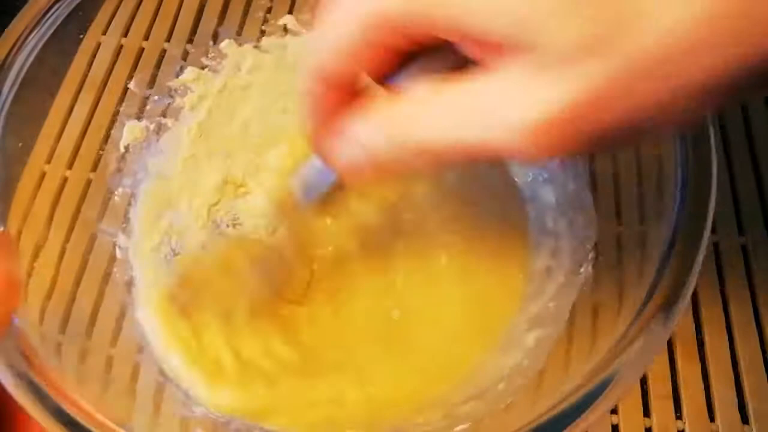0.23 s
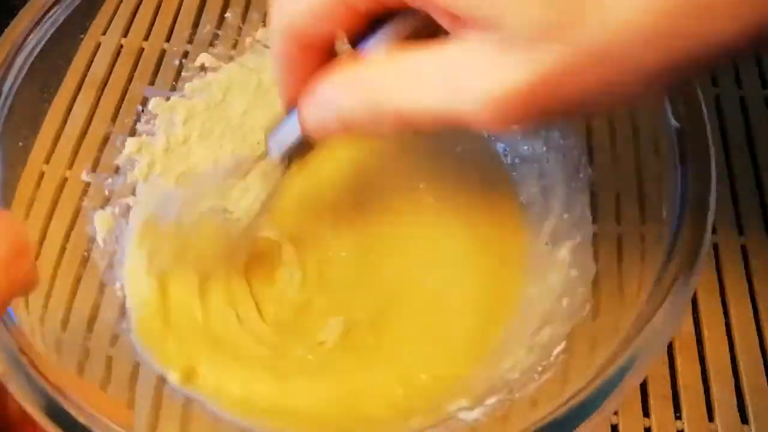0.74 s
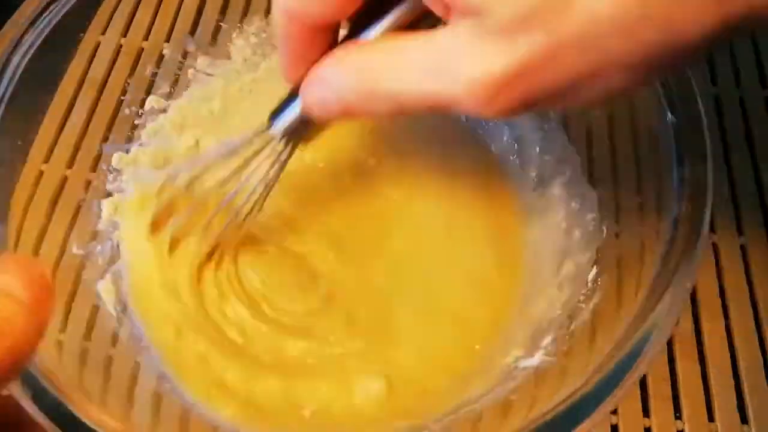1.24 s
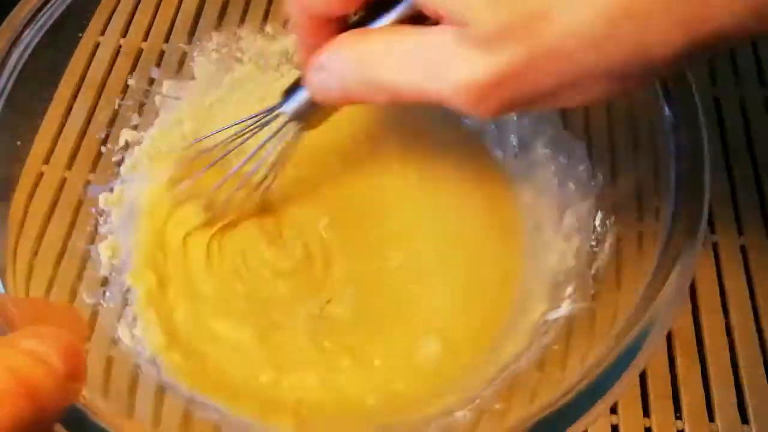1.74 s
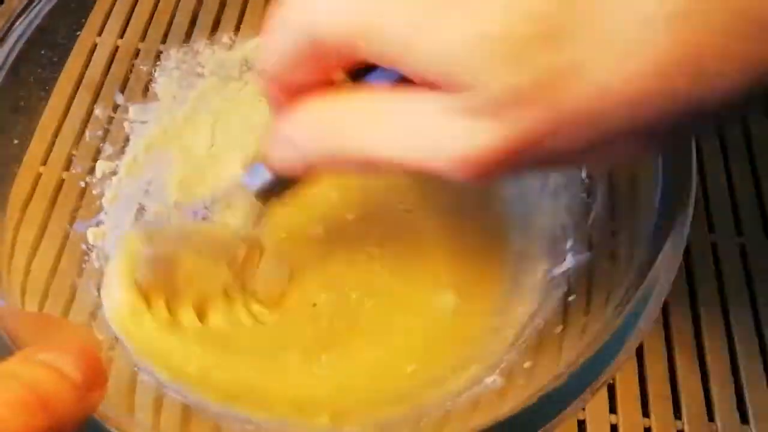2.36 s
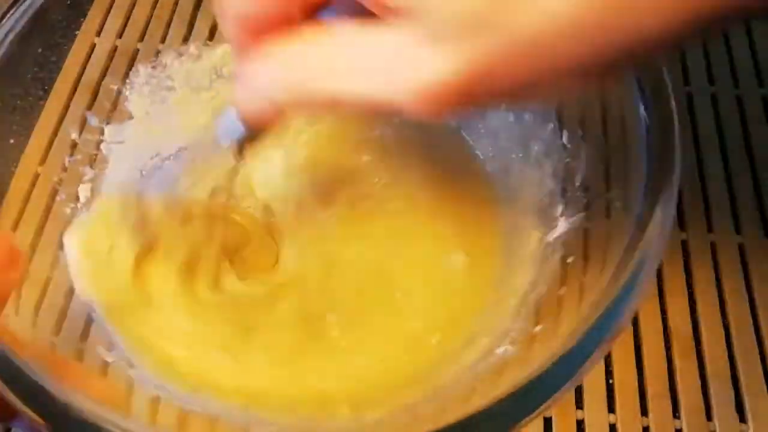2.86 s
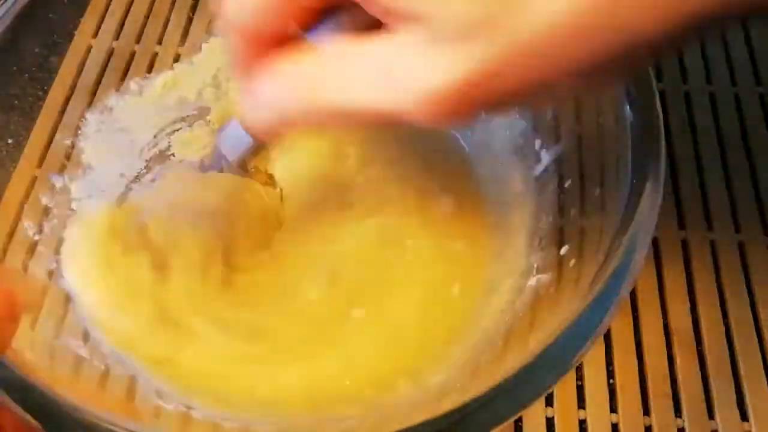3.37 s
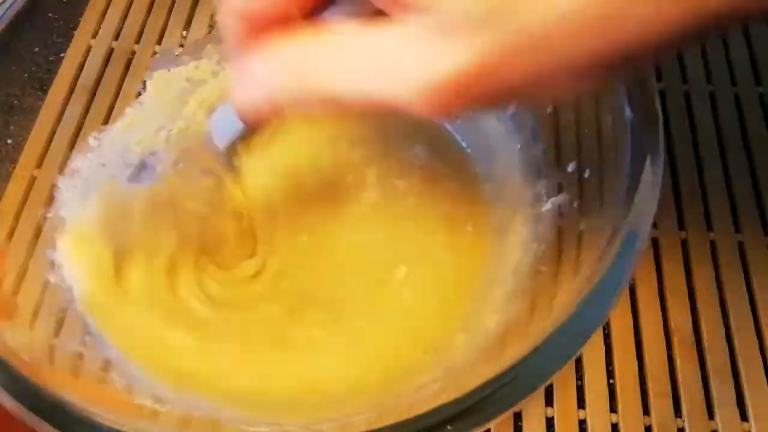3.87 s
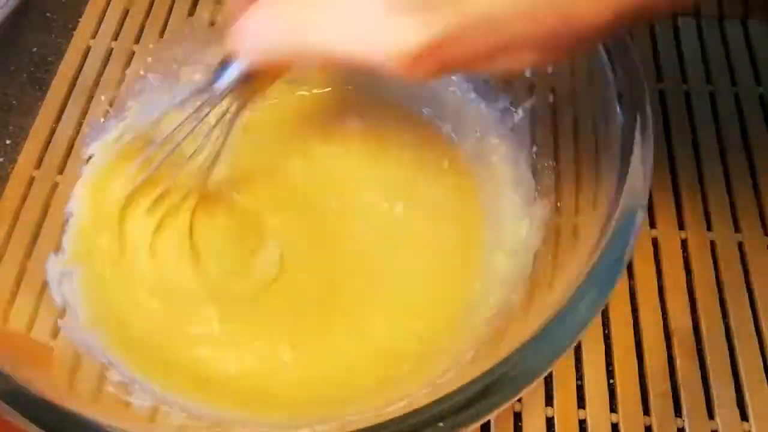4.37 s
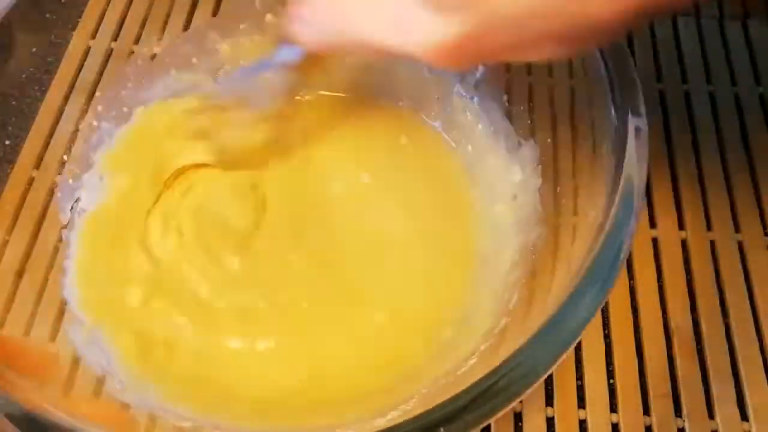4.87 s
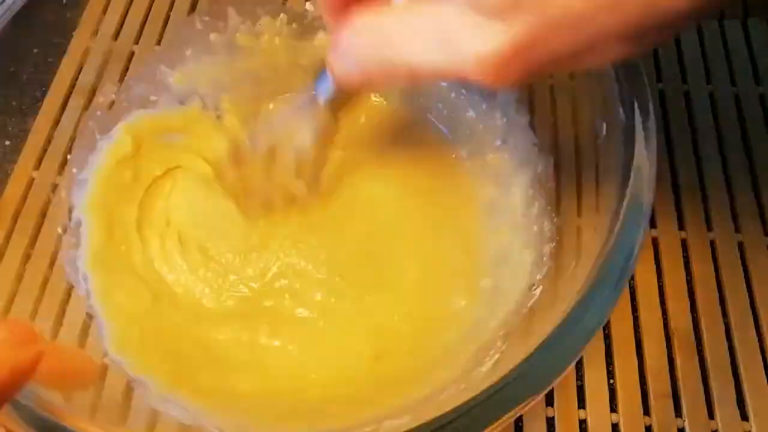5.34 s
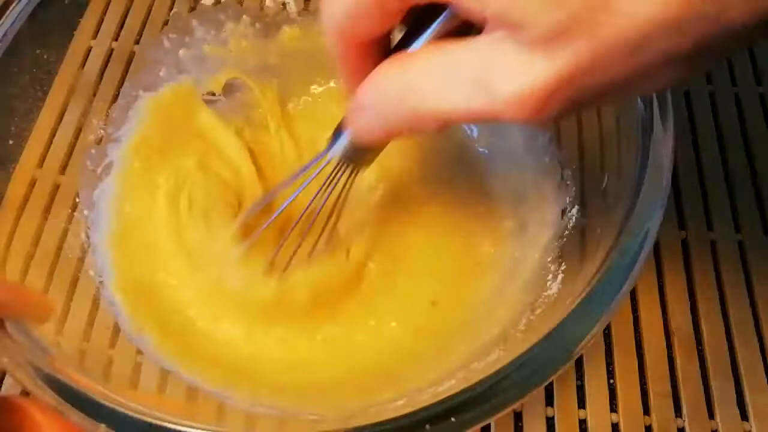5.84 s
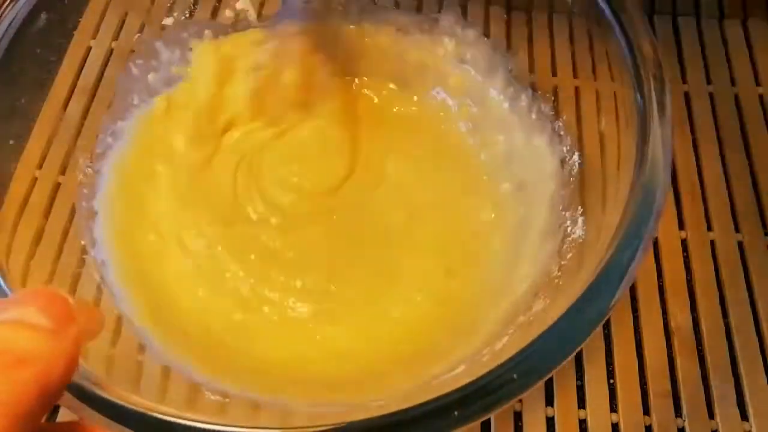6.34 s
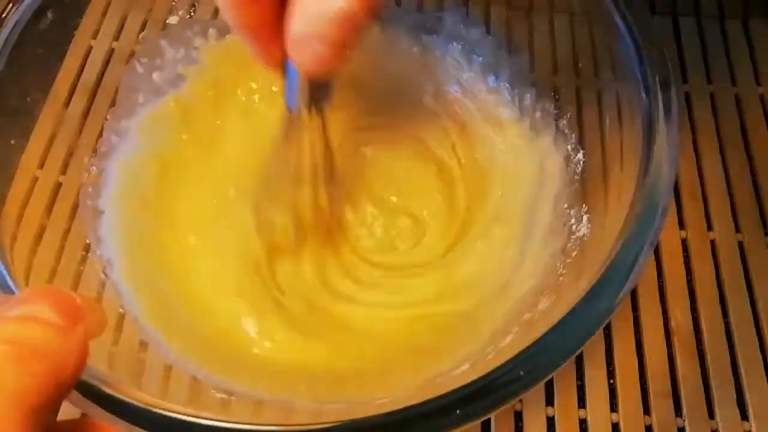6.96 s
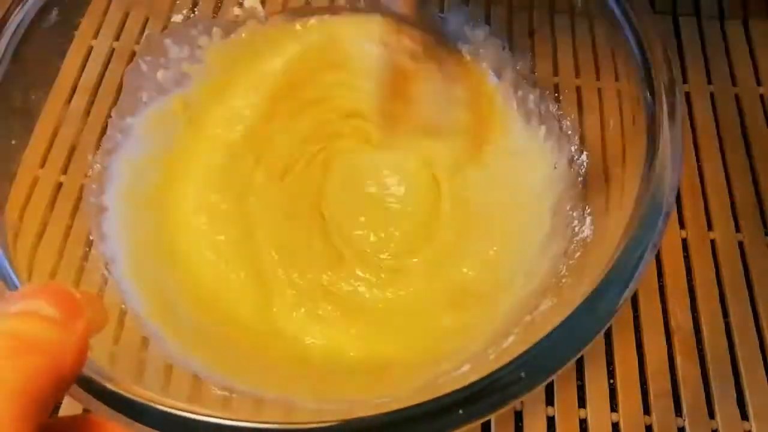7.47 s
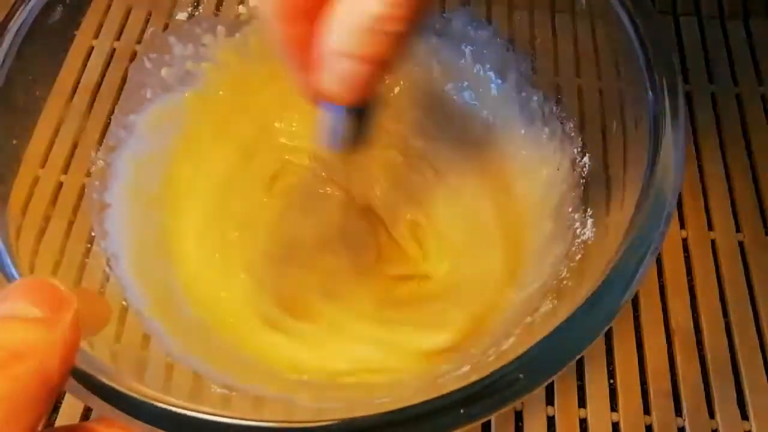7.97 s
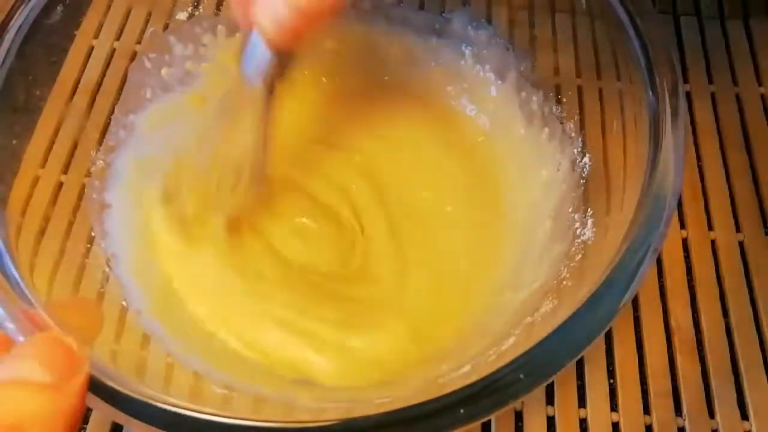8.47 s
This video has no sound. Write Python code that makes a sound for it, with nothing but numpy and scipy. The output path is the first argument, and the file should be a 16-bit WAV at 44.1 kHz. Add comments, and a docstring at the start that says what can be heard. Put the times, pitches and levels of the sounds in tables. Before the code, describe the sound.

A wire whisk scrapes briskly through batter in a glass bowl, wires ticking and briefly ringing the glass over a faint low kitchen rumble.

```python
"""A low kitchen rumble and faint air lie under everything, and a wire whisk drags through batter in a glass bowl.
From the first stroke its wires scrape and tick on the glass, which rings briefly; blows knock the damped bowl.
Between two and four seconds the rocking bowl jolts the counter and the rumble swells; the hardest blow lands
at six seconds, and near the end an air pocket bursts. Filtered noise makes the air, rumble, scrapes and ticks,
decaying sines make the glass, and sparse echoes make the kitchen."""
import sys
import numpy as np
from scipy import signal
from scipy.fft import rfft, irfft
from scipy.io import wavfile
from scipy.ndimage import uniform_filter1d

SR = 44100
rng = np.random.default_rng(int(sys.argv[2]) if len(sys.argv) > 2 else 0)


def unload_audio(sound):
    """Save the sound as a 16-bit wav file, at the path given as the first command line argument."""
    columns = np.transpose(np.atleast_2d(sound))
    # keep every value between -1 and 1, then stretch to whole-number steps
    steps = np.round(np.clip(columns, -1, 1) * 32767)
    wavfile.write(sys.argv[1], SR, steps.astype(np.int16))


N = 384111

# Colour of the room noise. Each row: frequency in Hz, density in dB per Hz before levelling.
ROOM = [(15, -83), (25, -5.5), (102, 2), (161, -5), (309, 1), (489, -19.5), (1190, -17.5), (2000, -27),
        (4250, -30), (7110, -40), (8830, -32), (10700, -66), (16000, -35)]
# Steady rumble. Each row: time in seconds, level in dB.
RUMBLE = [(0.0, -56), (0.75, -57.5), (1.65, -54), (1.95, -57.5), (3.5, -58), (4.4, -54.5), (5.45, -54.5),
          (6.0, -58), (7.0, -60), (7.6, -57.5), (8.2, -55.5), (8.71, -57)]
# The bowl rocks on its mat and jolts the counter. Each row: loudest moment in seconds, level in dB.
JOLTS = [(2.28, -45.5), (2.52, -44), (2.76, -44), (2.999, -45.5), (3.23, -45), (3.45, -52)]
# The counter thumps deeply. Each row: loudest moment in seconds, level in dB.
THUMPS = [(1.6, -56), (2.8, -50), (3.0, -57), (3.21, -58), (8.25, -57)]
# Strokes of the whisk along the wall. Each row: loudest moment in seconds, scrape level in dB before the
# layer trims, batter level in dB, length in seconds.
STROKES = [(0.143, -51.5, -65, 0.26), (0.41, -59.5, -65, 0.49), (0.629, -50.5, -60.5, 0.35),
           (0.831, -47, -59.5, 0.32), (1.083, -46, -61, 0.33), (1.322, -44, -62.5, 0.24),
           (1.563, -46, -57, 0.24), (1.805, -46, -60.5, 0.2), (2.039, -49.5, -62, 0.3),
           (2.27, -40.5, -54, 0.2), (2.509, -44.5, -57.5, 0.22), (2.756, -47.5, -60, 0.32),
           (2.991, -47.5, -60, 0.48), (3.239, -43, -55, 0.28), (3.495, -51, -63.5, 0.36),
           (3.732, -42.5, -61, 0.28), (3.964, -47.5, -72, 0.12), (4.02, -49, -57, 0.5),
           (4.229, -37.5, -52.5, 0.3), (4.452, -40, -58, 0.2), (4.687, -53.5, -65.5, 0.47),
           (4.942, -51, -64, 0.25), (5.197, -56, -65, 0.38), (5.422, -49, -63, 0.22),
           (5.653, -52, -61.5, 0.77), (5.833, -55, -66, 0.13), (5.977, -48, -62.5, 0.092),
           (6.075, -52.5, -56.5, 0.19), (6.23, -51.5, -60, 0.1), (6.334, -53, -69, 0.17),
           (6.522, -58, -68, 0.36), (6.69, -49, -64.5, 0.094), (6.765, -56.5, -64.5, 0.19),
           (6.962, -53.5, -69, 0.27), (7.05, -43.5, -66, 0.11), (7.207, -53.5, -69, 0.65),
           (7.41, -47.5, -65, 0.088), (7.543, -56, -64.5, 0.41), (7.708, -53, -72, 1),
           (7.873, -50.5, -67, 0.24), (7.973, -56, -63, 0.1), (8.026, -56, -67, 0.31),
           (8.18, -54, -62, 0.32), (8.319, -54.5, -63.5, 0.23), (8.517, -50, -61, 0.052),
           (8.621, -55, -82, 0.075)]
# Colour of steel on glass. Each row: frequency in Hz, density in dB per Hz before levelling.
STEEL = [(880, -48.5), (1500, -14), (2160, -19), (2440, -21.5), (3350, -12.5), (5880, -15.5), (8660, 5),
         (9560, -1.5), (11300, -19.5), (15100, -32), (16000, -50)]
# Colour of batter folding over. Each row: frequency in Hz, density in dB per Hz before levelling.
SLOSH = [(350, -4), (560, -1), (900, -8), (1250, -1), (2000, -11.5), (3300, -10), (5000, -12.5),
         (8000, -22)]
# Colour of the fine bright fizz. Each row: frequency in Hz, density in dB per Hz before levelling.
FIZZ = [(3000, -42), (6000, -1.5), (9000, 7.5), (12000, -1), (16000, -10)]
# Modes of the glass bowl. Each row: frequency in Hz, relative level in dB, T60 in seconds.
BOWL = [(530, -7, 0.02), (1220, -3.5, 0.16), (2165, -2, 1.0), (3400, -1, 0.14), (4820, 2, 0.04),
        (6360, 13, 0.045), (6730, 14, 0.04), (7510, 5, 0.04), (7950, -8, 0.064), (8880, 18, 0.03),
        (8700, -5, 0.22), (9300, -11, 0.26)]
# Blows on the bare glass above the batter. Each row: start in seconds, gain of the third bowl mode in dB,
# gain of the fourth in dB (both before the trim), free ring in seconds.
RINGS = [(0.0493, -76, -79, 0.034), (0.3097, -67, -65.5, 0.04), (0.548, -77, -78, 0.11),
         (0.7771, -71, -81, 0.038), (0.826, -80, -72, .05), (0.8769, -74, -91, 0.071),
         (1.0086, -68.5, -79, 0.075), (1.1004, -70, -81, 0.03), (1.245, -82, -85, 0.058),
         (1.3309, -73, -83, 0.041), (1.5688, -69, -79, 0.027), (2.02, -78, -79, 0.11),
         (2.232, -81, -59, 0.042), (2.4304, -73, -76, 0.068), (2.72, -77, -70, 0.082),
         (2.9208, -72, -67, 0.093), (3.1792, -72.5, -72, 0.12), (3.3633, -76, -91, 0.04),
         (3.4286, -77, -69, 0.04), (3.6731, -74, -65, 0.1), (3.71, -73, -64, 0.033),
         (3.9155, -67.5, -59, 0.027), (4.157, -65, -57, 0.044), (4.2164, -57, -55, 0.042),
         (4.45, -71.5, -74, 0.044), (4.6294, -76, -75, 0.032), (5.122, -72, -73, 0.014),
         (5.3597, -68.5, -74, 0.041), (5.9703, -79, -63, 0.03), (6.95, -93, -75, 0.037),
         (7.17, -91, -72, .05)]
# Wire taps. Each row: start in seconds, level in dB before the trim, rattle T60 in seconds.
TAPS = [(0.0844, -48, 0.031), (0.1742, -33, 0.0051), (0.301, -39, 0.034), (0.772, -43.5, 0.031),
        (0.807, -38, 0.017), (1.062, -38.5, 0.035), (1.0973, -38, 0.029), (1.239, -45, 0.041),
        (1.2763, -48, 0.029), (1.666, -45.5, 0.0098), (1.73, -43.5, 0.014), (1.7925, -57, 0.1),
        (1.8171, -39.5, 0.044), (1.963, -41.5, 0.035), (2.018, -36.5, 0.0082), (2.0416, -44, 0.048),
        (2.049, -36, 0.043), (2.182, -45, 0.019), (2.2282, -35, 0.032), (2.25, -45, 0.074),
        (2.2922, -32, 0.029), (2.4287, -44.5, 0.016), (2.473, -44, 0.059), (2.716, -43, 0.036),
        (2.7245, -38.5, 0.025), (2.922, -39.5, 0.016), (3.1768, -34.5, 0.02), (3.234, -45, 0.051),
        (3.4285, -34, 0.021), (3.4716, -44, 0.028), (3.515, -33, 0.0043), (3.548, -31, 0.0072),
        (3.665, -47, 0.043), (3.817, -33, 0.0094), (3.91, -46, 0.028), (3.926, -43, 0.062),
        (3.9878, -44, 0.026), (4.02, -30, 0.0048), (4.031, -28.5, 0.0043), (4.143, -37, 0.015),
        (4.1544, -29.5, 0.016), (4.2168, -29.5, 0.057), (4.235, -46, 0.033), (4.2662, -42, 0.046),
        (4.4481, -45.5, 0.059), (4.457, -28, 0.015), (4.509, -43.5, 0.023), (4.968, -28, 0.0078),
        (5.119, -43.5, 0.02), (5.165, -29, 0.0053), (5.2899, -36, 0.0081), (5.4638, -37.5, 0.017),
        (5.5821, -38, 0.016), (5.6135, -28.5, 0.0067), (5.6587, -37.5, 0.027), (5.772, -42, 0.042),
        (5.83, -43, 0.008), (5.851, -25.5, 0.0099), (5.864, -34, 0.014), (6.0302, -31, 0.0048),
        (6.038, -8, 0.0041), (6.062, -34, .006), (6.206, -41, 0.021), (6.2586, -28, 0.0046),
        (6.264, -23, 0.0044), (6.314, -44, 0.036), (6.3217, -34.5, 0.021), (6.5458, -40.5, 0.0099),
        (6.554, -37, 0.0069), (6.67, -40, 0.012), (6.948, -33.5, 0.011), (6.992, -43, .015),
        (7.0323, -44, 0.011), (7.0476, -37, 0.015), (7.1005, -44, 0.012), (7.114, -40, 0.0044),
        (7.121, -33, 0.0064), (7.128, -41, 0.011), (7.154, -40, 0.005), (7.387, -35, 0.0062),
        (7.402, -44, 0.009), (7.524, -36, 0.03), (7.6802, -43, 0.012), (7.687, -28, 0.006),
        (7.743, -36, 0.0055), (7.9337, -40.5, 0.043), (8.666, -35.5, 0.027)]
# Modes of the bowl damped by batter and mat. Each row: frequency in Hz, relative level in dB, T60 in seconds.
KNOCK = [(552, -3.5, 0.073), (820, -13.5, 0.011), (1238, 0.5, 0.021), (1660, 2.5, 0.0081),
         (2326, 6.5, 0.0074), (2810, 9, 0.0059), (3600, 6.5, 0.0056), (4940, 13, 0.0056)]
# Blows through the batter. Each row: start in seconds, peak level in dB before the trim and bass cut,
# centre of the blow's spectrum in Hz, contact T60 in seconds.
KNOCKS = [(0.131, -53, 1160, 0.0091), (0.387, -51.5, 1170, 0.008), (0.881, -49.5, 1290, 0.069),
          (1.556, -44.5, 514, 0.089), (3.236, -39, 536, 0.032), (3.236, -35.5, 2600, 0.039),
          (3.511, -54.5, 520, 0.031), (3.959, -44.5, 520, 0.025), (4.767, -55, 1290, 0.0079),
          (4.968, -40, 750, 0.0076), (5.166, -41.5, 1330, 0.0095), (5.356, -46, 810, 0.018),
          (5.653, -36, 1140, 0.0072), (5.853, -29, 1150, 0.017), (6.038, -18.5, 1450, 0.0032),
          (6.045, -46.5, 880, 0.19), (6.227, -48.5, 1600, 0.035), (6.2644, -32.5, 1500, 0.013),
          (6.999, -52.5, 1900, .01), (7.127, -49, 1290, .01), (7.21, -54.5, 560, 0.017),
          (7.5, -47, 2500, 0.0083), (7.526, -48, 1300, 0.012), (7.825, -49, 3320, 0.015),
          (7.936, -46.5, 1150, 0.019), (7.957, -47, 1400, 0.052), (8.162, -48, 3600, .006),
          (8.171, -46.5, 3600, 0.025), (8.229, -45, 2000, 0.0089), (8.382, -40, 2200, 0.016),
          (8.529, -56, 590, 0.014)]
# An air pocket in the batter bursts. The one row: start in seconds, starting level in dB, pitch in Hz,
# width in Hz, T60 in seconds.
CLACK = (8.3225, -36, 2418, 900, .035)
# Decay of the kitchen's echoes. Each row: frequency in Hz, T60 in seconds.
KITCHEN = [(300, 0.11), (1500, 0.15), (5000, 0.11), (12000, 0.057)]

AIR_DB = -64.5
HUM_HZ, HUM_WIDTH_HZ, HUM_DB = 99, 9.1, 6  # the counter's own resonance; its gain adds to the plain rumble
JOLT_S, THUMP_S, JOLT_FADE_DB = 0.15, 0.19, 11.5  # thumps share the fade
THUMP_HZ = 41.6
RISE_SHARE = 0.46  # part of a swell before its loudest moment
# How far each layer sinks at both ends of a stroke, and its floor between strokes
SCRAPE_FADE_DB, SCRAPE_REST_DB = 33.5, -66.5
BATTER_FADE_DB, BATTER_REST_DB = 19, -74
SLIP_SPREAD_DB, SLIP_CLUMP_DB = 2, 6.5
SWISH_DRIFT_DB, HUM_CLUMP_DB, FIZZ_CLUMP_DB = 3, 6, 7.5
RING_SPREAD_DB = 3.5
KNOCK_DETUNE, CONTACT_DETUNE = 0.02, 0.012  # typical pitch scatter as a fraction
EDGE_HZ = 15900


def amp(db):
    """Gain of a level in dB."""
    return 10 ** (np.asarray(db) / 20)


def evened(x):
    """Scales to rms 1."""
    return x / np.sqrt(np.mean(x ** 2) + 1e-20)


def read(points, hz):
    """Reads a table on a log frequency axis."""
    f, value = np.transpose(points)
    return np.interp(np.log(hz + 1), np.log(f + 1), value)


def curve(rows):
    """Columns of a table joined by straight lines in time."""
    s, *columns = np.transpose(rows)
    return [np.interp(np.arange(N) / SR, s, c) for c in columns]


def add(mix, s, sound):
    """Adds a sound at a time in seconds, cut off at the end of the mix."""
    part = mix[round(s * SR):][:len(sound)]
    part += sound[:len(part)]


def colour(x, points):
    """Minimum-phase filter shaped to the given spectrum, its impulse response scaled to energy 1."""
    log_gain = np.log(amp(read(points, abs(np.fft.fftfreq(4096, 1 / SR)))))
    response = np.fft.ifft(np.exp(np.conj(signal.hilbert(log_gain)))).real[:1024]
    return signal.oaconvolve(x, response / np.linalg.norm(response))[:len(x)]


def swells(peaks_s, peaks_db, lengths_s, fade_db):
    """Gain over time of swells that rise to their peak and sink again, straight in dB, summed in power."""
    t = np.arange(0, N + 64, 64) / SR
    power = 0
    for s, db, length in np.broadcast(peaks_s, peaks_db, lengths_s):
        away = np.maximum((s - t) / RISE_SHARE, (t - s) / (1 - RISE_SHARE)) / length
        power = power + amp(2 * (db - fade_db * away))
    return np.interp(np.arange(N) / SR, t, np.sqrt(power))


def room_tone():
    """Steady air noise, a resonant rumble that swells with each jolt, and deep thumps of the counter."""
    hz = np.fft.rfftfreq(N, 1 / SR)
    noise = rfft(rng.standard_normal(N)) * amp(read(ROOM, hz))
    low = 1 / (1 + (hz / 200) ** 6)
    boom = 1 + amp(HUM_DB) / (1 + (2 * (hz - HUM_HZ) / HUM_WIDTH_HZ) ** 2)
    air = amp(AIR_DB) * evened(irfft(noise * (1 - low), N))
    jolts = swells(*np.transpose(JOLTS), JOLT_S, JOLT_FADE_DB)
    shaking = np.hypot(amp(curve(RUMBLE)[0]), jolts)
    rumble = shaking * evened(irfft(noise * low * boom, N))
    deep_shape = hz / (1 + (hz / THUMP_HZ) ** 6)
    deep = evened(irfft(rfft(rng.standard_normal(N)) * deep_shape, N))
    thumps = swells(*np.transpose(THUMPS), THUMP_S, JOLT_FADE_DB) * deep
    return air + thumps + rumble


def grains(per_s, spread_db, clump_db, size=300):
    """Dense tiny impulses of uneven size whose strength comes in clumps."""
    force = amp(spread_db * np.minimum(rng.exponential(1, N), 5)) * rng.standard_normal(N)
    clumps = amp(clump_db * evened(uniform_filter1d(rng.standard_normal(N), size)))
    struck = rng.random(N) < per_s / SR
    return evened(force * clumps * struck)


def patchy(points, centres_hz, narrow_db, per_s, spread_db, clump_db, size=300):
    """Several unrelated streams of grains, each favouring its own part of the spectrum."""
    hz = np.geomspace(200, 20000, num=40)
    total = np.zeros(N)
    for centre in centres_hz:
        bell_db = read(points, hz) - narrow_db * np.log2(hz / centre) ** 2
        weight = np.sqrt(np.sum(amp(2 * bell_db) * hz))  # restores the band's share of energy
        stream = grains(per_s, spread_db, clump_db, size)
        total += weight * colour(stream, np.transpose([hz, bell_db]))
    return evened(total)


def ring(modes, gains_db, detune=1, size=7000):
    """One blow: decaying sines, each mode with its own gain by where and how hard it lands, pitches scaled."""
    hz, db, t60 = np.transpose(modes)[:, :, None]
    t = np.arange(size) / SR
    hz = hz * np.reshape(detune, (-1, 1))
    level = amp(db + gains_db[:, None] - 60 * t / t60)
    return (level * np.sin(2 * np.pi * hz * t)).sum(0)


def body():
    """Response of the bowl to light contact: only upper modes, a little off pitch at each of three spots."""
    upper = BOWL[5:]
    chance = rng.standard_normal((3, len(upper)))
    response = sum(ring(upper, 0 * spot, 1 + CONTACT_DETUNE * spot) for spot in chance)
    return response / np.linalg.norm(response)


def drag():
    """Slips of the wires hiss over a smooth swish and hum in the glass; the batter folds, with a fine fizz."""
    s, scrape_db, batter_db, length = np.transpose(STROKES)
    scrape = np.hypot(swells(s, scrape_db, length, SCRAPE_FADE_DB), amp(SCRAPE_REST_DB))
    slosh = np.hypot(swells(s, batter_db, length, BATTER_FADE_DB), amp(BATTER_REST_DB))
    hum = signal.oaconvolve(grains(6000, 4.2, HUM_CLUMP_DB) * scrape, body())[:N]
    slips = patchy(STEEL, (4000, 7000, 11000), 13.0, 12000, SLIP_SPREAD_DB, SLIP_CLUMP_DB) * scrape
    # A grain on every sample makes the swish smooth
    swish = patchy(STEEL, (4520, 6530, 8140, 9400, 12400), 38.3, SR, 0, SWISH_DRIFT_DB, size=1800) * scrape
    batter = patchy(SLOSH, (589, 1176, 2200, 4230), 10.9, 5000, 0.51, 5.4) * slosh
    # The fine fizz follows the scrape only weakly
    fizz = grains(8000, 1.0, FIZZ_CLUMP_DB) * amp(-51.5) * scrape ** 0.28
    wires = amp(-4.0) * slips + amp(-7.0) * swish + amp(-10.0) * hum
    return wires + batter + colour(fizz, FIZZ)


def rings():
    """Struck glass sings in its modes until batter covers it again and damps it fast."""
    out, t = np.zeros(N), np.arange(7000) / SR
    for s, third_db, fourth_db, free in RINGS:
        scatter_db = RING_SPREAD_DB * rng.standard_normal(len(BOWL))
        gains_db = min(third_db, fourth_db) - 3.5 + scatter_db
        gains_db[2:4] = third_db, fourth_db
        damping_db = -700 * np.maximum(t - free, 0)
        swell = 1 - np.exp(-t / 0.00066)
        # The ring wavers roughly in level
        waver_db = 1.9 * evened(uniform_filter1d(rng.standard_normal(len(t)), 350))
        add(out, s, amp(9.5 + damping_db + waver_db) * swell * ring(BOWL, gains_db))
    return out


def taps():
    """Each tap is a short noisy rattle of wires landing one after another, heard as steel and through the bowl."""
    rattle, t = np.zeros(N), np.arange(4000) / SR
    rise = 1 - np.exp(-t / 0.00036)
    for s, db, t60 in TAPS:
        chance = rng.standard_normal((2, len(t)))
        bounces = chance[0] * amp(2 * evened(uniform_filter1d(chance[1], 30)))
        add(rattle, s, amp(db - 1.0 - 60 * t / t60) * rise * evened(bounces))
    through_bowl = signal.oaconvolve(rattle, body())[:N]
    return colour(rattle, STEEL) + amp(-9) * through_bowl


def knocks():
    """Short dull blows: a rough contact drives the damped bowl; the bass is cut."""
    out, t = np.zeros(N), np.arange(5000) / SR
    for s, db, centre_hz, t60 in KNOCKS:
        chance = rng.standard_normal((2, len(t)))
        contact = (t == 0) + 0.18 * chance[0] * amp(-60 * t / t60)  # first touch, then grit
        octaves = np.log2(np.transpose(KNOCK)[0] / centre_hz)
        gains_db = -11.0 * octaves ** 2 + 2 * chance[1, :len(KNOCK)]
        detune = 1 + KNOCK_DETUNE * chance[1, -len(KNOCK):]
        blow = signal.oaconvolve(ring(KNOCK, gains_db, detune), contact)
        add(out, s, amp(db + 4.0) * blow / abs(blow).max())
    return signal.sosfilt(signal.butter(4, 460, "high", fs=SR, output="sos"), out)


def clack():
    """An air pocket bursts: a fading puff of noise through its broad, hollow resonance."""
    s, db, hz, width_hz, t60 = CLACK
    out, t = np.zeros(N), np.arange(3000) / SR
    band = [hz - width_hz / 2, hz + width_hz / 2]
    pocket = signal.butter(2, band, "band", fs=SR, output="sos")
    puff = evened(signal.sosfilt(pocket, rng.standard_normal(len(t))))
    add(out, s, amp(db - 60 * t / t60) * puff)
    return out


def kitchen(x):
    """Sparse echoes of random sign, the treble dying first."""
    echoes = np.zeros(SR // 2)
    at = np.arange(120, SR // 2 - 20, 20)
    echoes[at + rng.integers(0, 20, len(at))] = rng.choice([-1., 1.], len(at))
    hz, t, z = signal.stft(echoes, SR, nperseg=128)
    decay = amp(-60 * t / read(KITCHEN, hz)[:, None])
    tail = signal.istft(z * decay, SR, nperseg=128)[1]
    return signal.oaconvolve(x, tail / np.linalg.norm(tail))[:N]


def scene():
    """Whisk and bowl with their echoes over the room tone; the bright layers feed the echoes a little more."""
    bright = taps() + drag() + rings()
    dull = knocks() + clack()
    echoes = kitchen(amp(-11.5) * bright + amp(-14.0) * dull)
    return (bright + dull + echoes + room_tone())[None]


def record(dry):
    """Band limit of the recorder: a steep, linear-phase low-pass."""
    low_pass = signal.firwin(511, EDGE_HZ, window=("kaiser", 9), fs=SR)
    return signal.oaconvolve(dry, low_pass[None], "same")


dry = scene()
out = record(dry)
unload_audio(out)
```